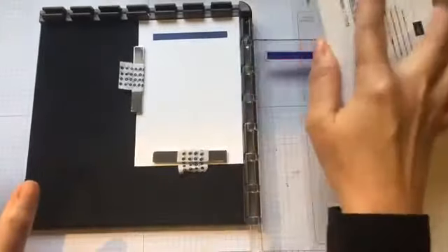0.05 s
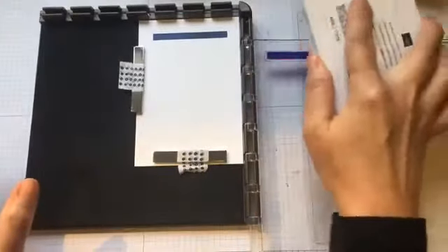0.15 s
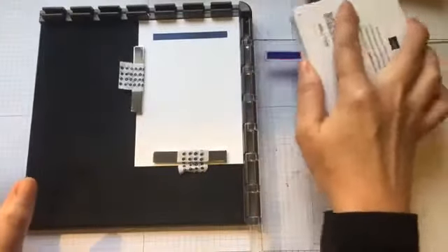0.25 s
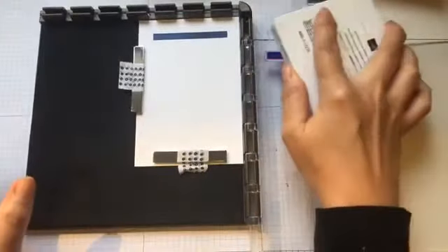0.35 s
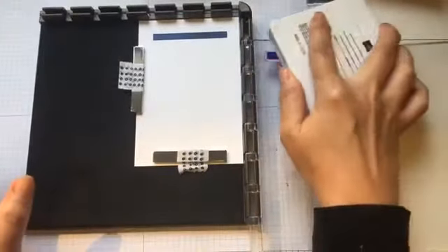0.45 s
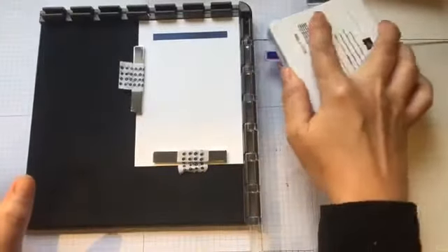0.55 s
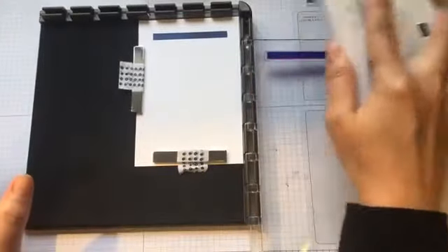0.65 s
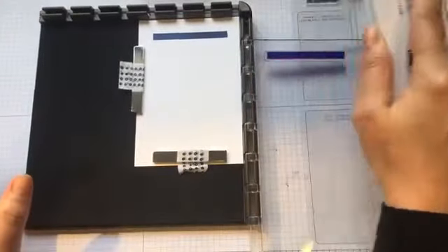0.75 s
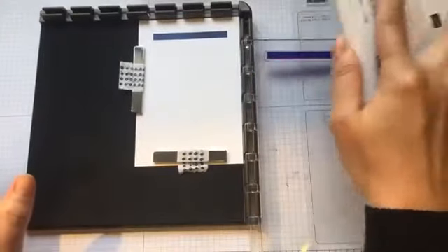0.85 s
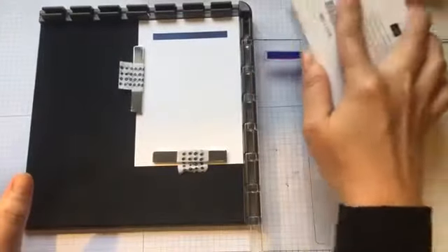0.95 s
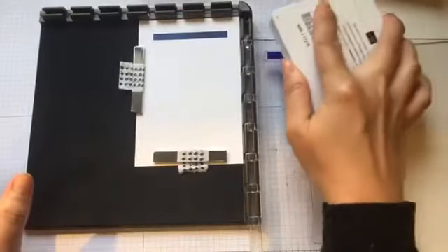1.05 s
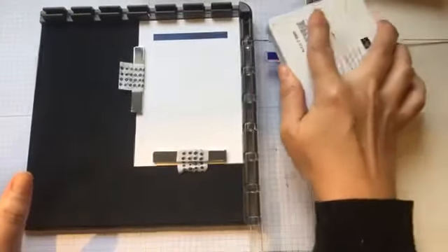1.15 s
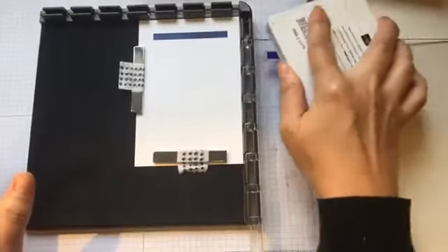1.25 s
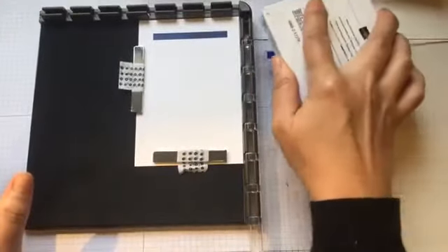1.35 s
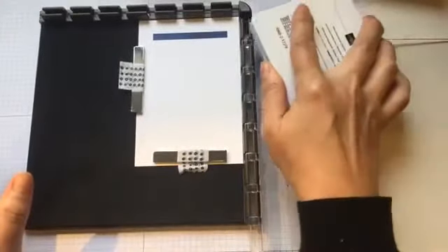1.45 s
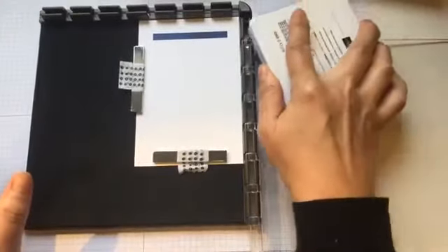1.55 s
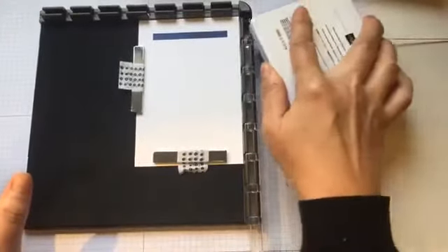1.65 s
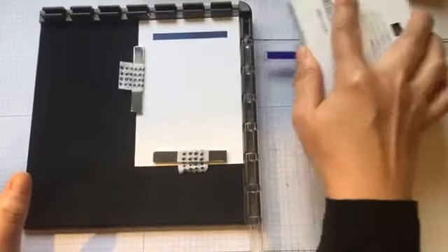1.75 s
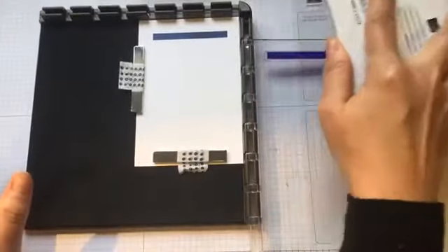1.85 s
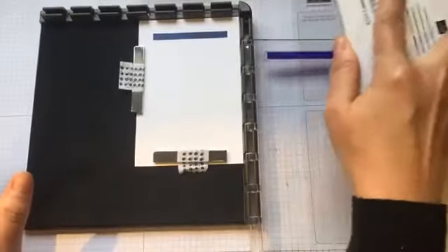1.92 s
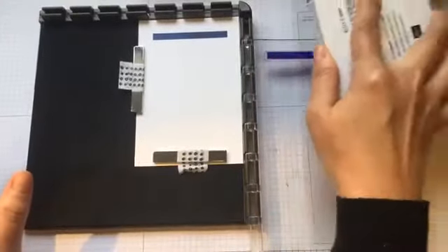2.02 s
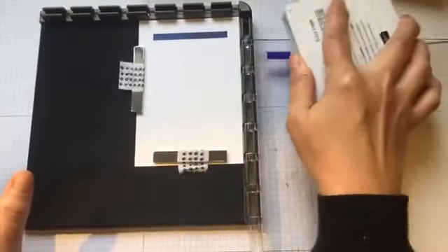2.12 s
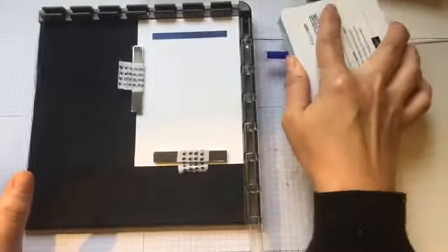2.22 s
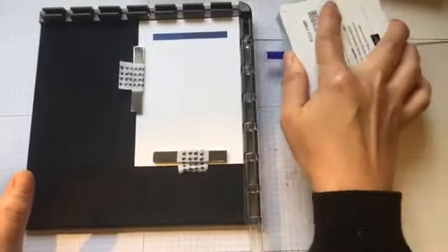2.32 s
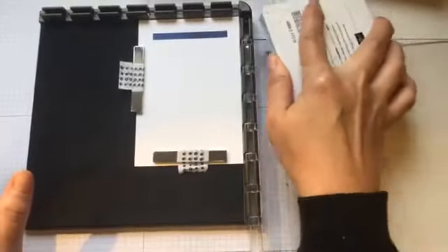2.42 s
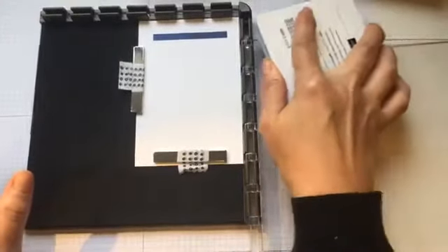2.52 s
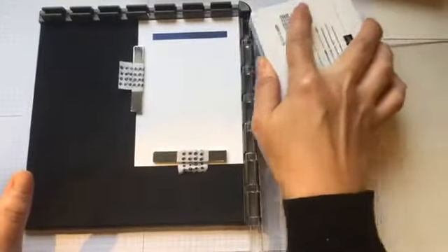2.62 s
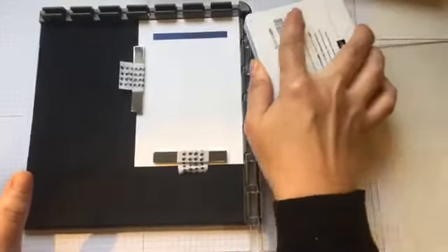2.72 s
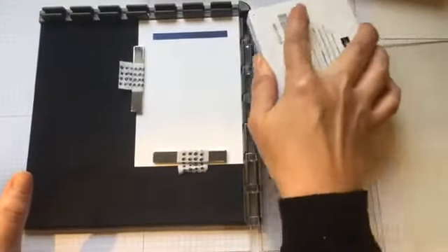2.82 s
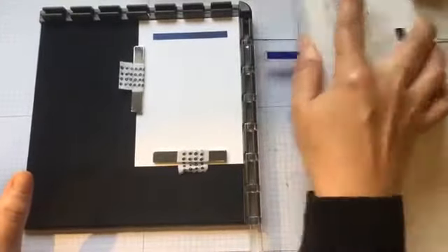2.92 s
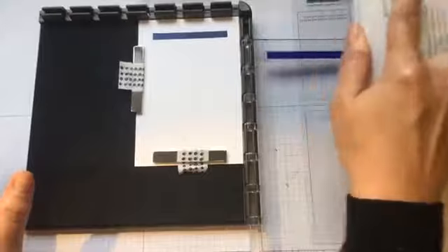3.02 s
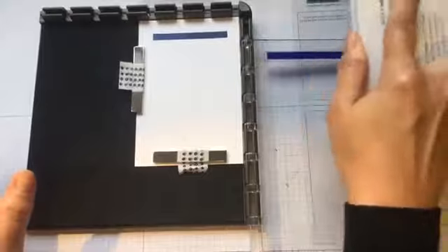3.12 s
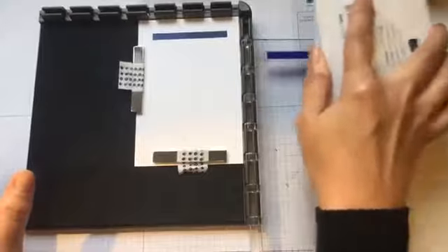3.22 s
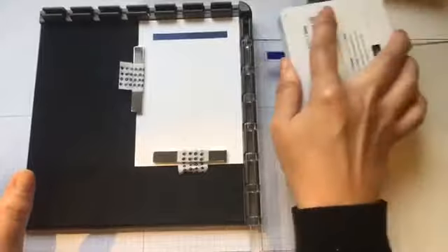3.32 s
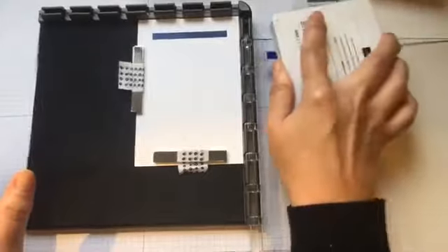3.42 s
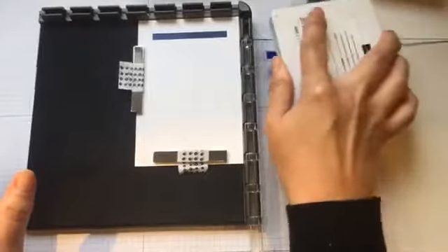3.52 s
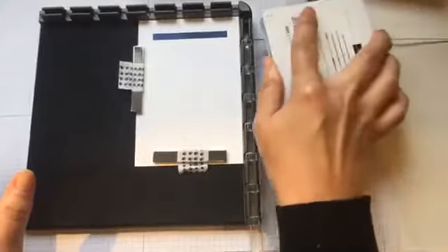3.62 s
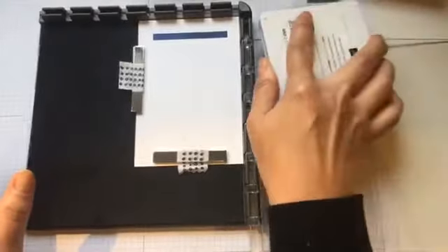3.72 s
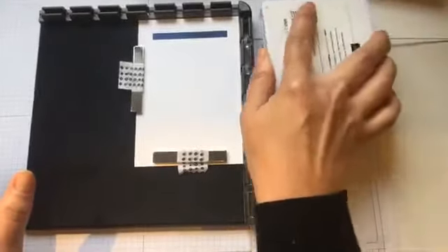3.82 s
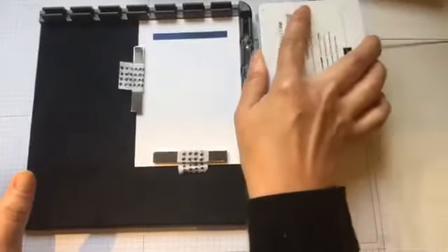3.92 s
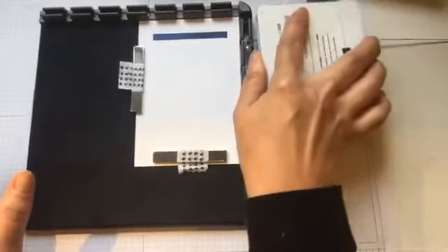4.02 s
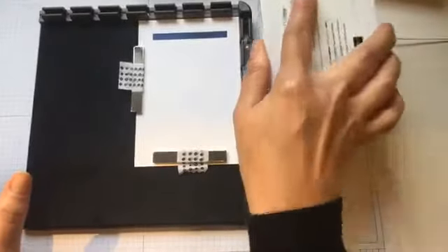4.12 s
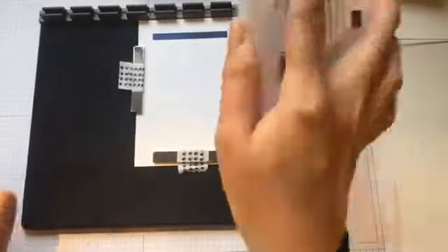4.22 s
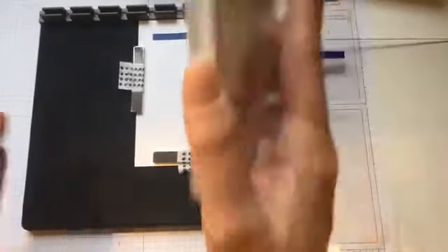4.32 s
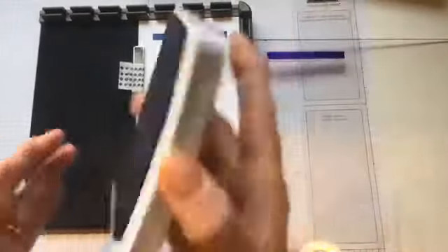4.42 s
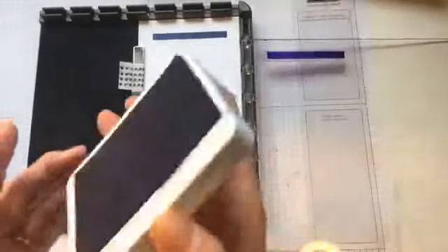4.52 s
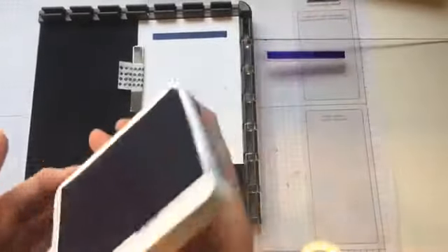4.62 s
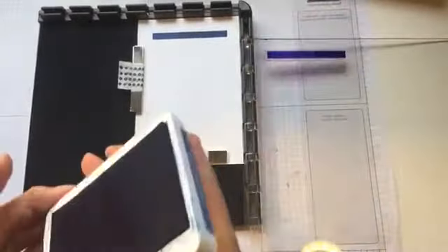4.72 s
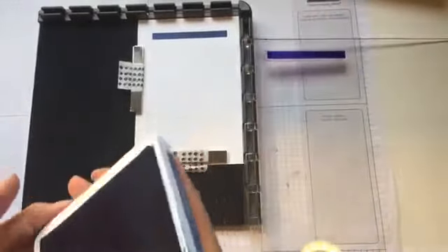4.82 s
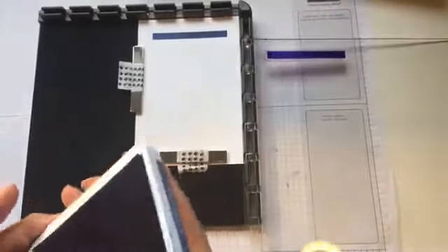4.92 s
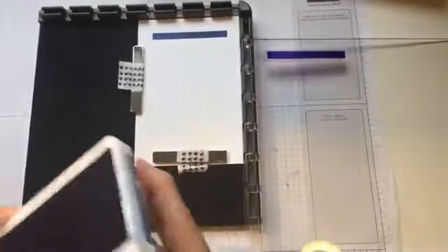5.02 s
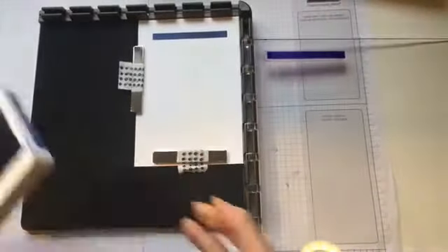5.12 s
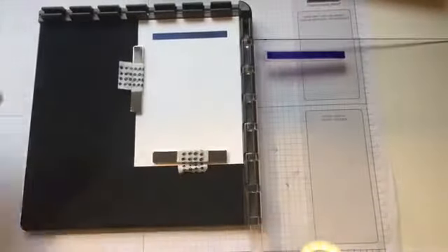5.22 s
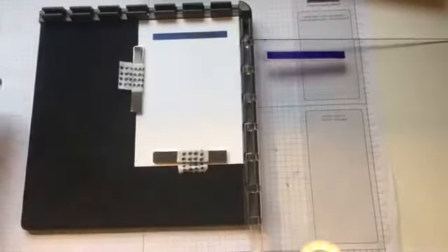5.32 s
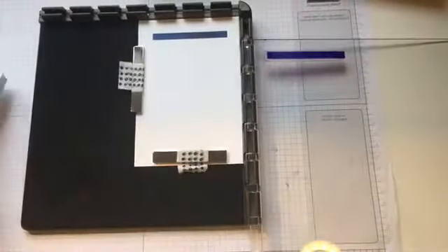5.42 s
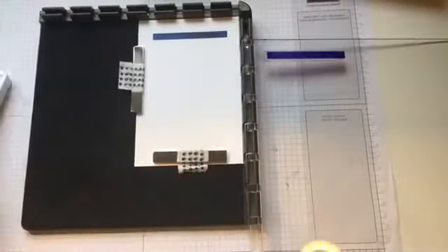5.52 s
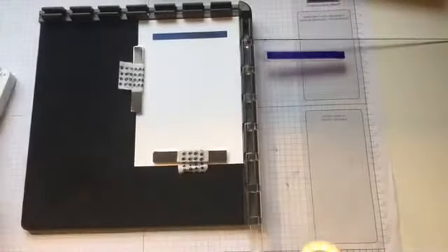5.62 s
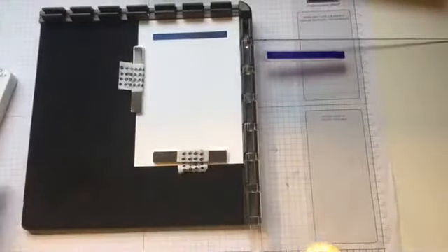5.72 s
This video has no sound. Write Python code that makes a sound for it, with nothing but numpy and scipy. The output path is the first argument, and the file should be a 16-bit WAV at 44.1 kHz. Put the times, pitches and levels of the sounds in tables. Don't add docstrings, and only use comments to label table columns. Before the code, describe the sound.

Close to a phone microphone in a small quiet room, a plastic ink pad taps a stamp plate: one gentle tap, then two firm ones, three more knocks close together, and three evenly spaced. Each knock has a quick bounce and dull desk thud, followed by a faint sticky lift. After a pause with tiny case creaks, the pad clatters onto the desk.

```python
import sys
import numpy as np
from scipy import signal
from scipy.fft import rfft, irfft
from scipy.io import wavfile

SR = 44100
rng = np.random.default_rng(int(sys.argv[2]) if len(sys.argv) > 2 else 0)


def makeup_ratio(level_db):
    decades = np.asarray(level_db, float) / 20
    return 10 ** decades


def store_pcm(level_fs):
    pcm = np.round(np.clip(level_fs, -1, 1) * 32767).astype(np.int16)
    wavfile.write(sys.argv[1], SR, np.atleast_2d(pcm).T)


N = 253927

# frequency [Hz], level [dB per Hz].
AIR_COLOUR = [(15, -33.5), (25, -5), (128, 0), (150, -6), (250, -3), (335, -9), (588, -14), (811, -13),
              (879, -16.5), (1540, -19), (1760, -20), (2430, -20), (13500, -29.5), (15000, -55.5)]
# frequency [Hz], level [dB rms].
HUM_TONES = [(123.8, -90), (247.6, -87), (861.3, -87.5)]
# octave band centre [Hz], t60 [s], level [dB].
ROOM_BANDS = [(86.8, 0.6, -6), (194, 0.3, 5), (313.7, 0.3, -3.5), (720, 0.3, -2), (1400, 0.29, -2.5),
              (2800, 0.29, 0), (5040, 0.29, -1), (10700, 0.28, 0)]
# frequency [Hz], level [dB], t60 [s].
DESK_MODES = [(54.3, -9.5, .2), (79.8, -8.5, 0.18), (92.5, 2.5, 0.11), (115.7, 2.5, 0.1), (137.4, -8, 0.16)]
# frequency [Hz], level [dB], t60 [s].
FLEX_MODES = [(166, -2.5, 0.12), (223, -14.5, 0.14), (269.2, 7.5, 0.086), (317.3, -1.5, 0.095),
              (366, -29.5, 0.024)]
# frequency [Hz], level [dB], t60 [s].
PLATE_MODES = [(468, -44, 0.0097), (532, -7, 0.037), (634, -1, 0.068), (793, -8.5, 0.019),
               (937, -11, 0.081), (1060, -1.5, 0.035), (1272, 2, 0.011), (1472, -10.5, 0.027),
               (1552, 1.5, 0.02), (1658, 5, 0.012), (1970, 0.5, 0.01), (2136, 3, 0.013), (2330, -18, 0.01),
               (2680, -2, 0.012), (2850, 5, 0.008), (3360, -7, 0.0075), (3860, 3.5, 0.0056),
               (4440, 4.5, 0.0036), (5230, 1, 0.012), (5500, -11, 0.012), (6620, -35.5, 0.0052),
               (8530, -5, 0.0043)]
# frequency [Hz], level [dB], t60 [s].
PAD_MODES = [(660, -1.5, 0.068), (770, -2, 0.041), (900, -5, 0.049), (1130, 6, 0.026), (1405, 19.5, 0.0086),
             (1716, 9.5, 0.032), (1900, 8.5, 0.0091), (2200, 3, 0.029), (2560, 9, 0.011), (2700, 4, 0.015),
             (3110, 5, 0.012), (3500, -25, .011), (3730, -19, 0.018), (5300, -29, .009)]
# start [s], peak level [dB], mode favoured [Hz], push on the desk [dB].
SET_DOWNS = [
    (5.5098, -30.5, 3500, -54),
    (5.5115, -31.5, 900, -51.5),
    (5.581, -21.5, 2800, -58),
    (5.582, -16.5, 1130, -47),
    (5.5835, -16.5, 720, -37.5),
    (5.5845, -18, 1680, -35.5),
    (5.589, -27, 770, -28.5),
]
# start [s], peak level [dB], mode favoured [Hz].
FINGER_CREAKS = [
    (3.018, -60.5, 4440),
    (4.473, -41.5, 1400),
    (4.4742, -49.5, 4440),
    (4.478, -49, 1460),
    (5.033, -63, 1400),
    (5.096, -53, 1400),
    (4.4747, -57.5, 660),
]
# start [s], peak level [dB], mode favoured [Hz], push on the desk [dB].
STICKY_LIFTS = [(.612, -75, 600, -49.5), (.666, -62, 2700, -73), (.672, -44, 1400, -41.5),
                (.678, -71, 590, -42.5), (.76, -63, 600, -53.5), (1.349, -38, 900, -41),
                (1.355, -41, 1860, -40.5), (1.672, -38.5, 1450, -42), (1.677, -43, 900, -35.5),
                (1.75, -53, 900, -52), (2.398, -43.5, 900, -46), (2.66, -47, 900, -42),
                (2.878, -64, 1500, -47), (3.545, -42, 1500, -32.5), (3.64, -63, 1500, -51),
                (3.804, -56, 900, -33.5), (3.904, -67, 1700, -71), (4.13, -59, 2900, -58)]
# start [s], peak level [dB], mode favoured [Hz], push on the desk [dB].
EDGE_TICKS = [
    (2.8018, -32, 5570, -60),
]
# start [s], peak level [dB], mode favoured [Hz], push on the desk [dB].
EDGE_KNOCKS = [
    (2.8025, -19, 774, -44),
    (2.8035, -28.5, 1590, -64),
    (2.808, -27, 694, -28.5),
]
# start [s], peak level [dB], mode favoured [Hz], push on the desk [dB].
FAR_EDGE_LANDINGS = [
    (1.255, -26, 510, -25.5),
    (1.602, -23, 1060, -31),
    (2.303, -23, 1036, -23),
    (2.582, -26, 474, -24),
    (2.814, -24.5, 2200, -25.5),
    (2.833, -27.5, 1180, -25.5),
    (3.504, -22, 1060, -24.5),
    (3.776, -26, 1060, -22.5),
    (4.049, -21.5, 1460, -29),
]
# knock [s], peak level [dB], mode favoured by the spot struck [Hz],
# push of the hand on the desk [dB], rebound relative to the knock [dB].
PAD_TAPS = [
    (.502, -26, 2600, -32.5, -6.5),
    (1.2455, -13.5, 2800, -26, -17.5),
    (1.597, -17, 1060, -28, -12),
    (2.298, -16.5, 1060, -26, -13),
    (2.573, -14, 900, -26, -16.5),
    (3.497, -17.5, 1060, -25.5, -16.5),
    (3.768, -16.5, 1060, -28, -11.5),
    (4.043, -15, 2200, -23, -13),
]

# hardness [octaves re 1 kHz], rise of hardness with the mode favoured
# [octaves per octave], desk boom and plate thud relative to the push [dB].
TOUCH = (1.6, 6, -18, -14)
KNOCK = (0.5, -0.02, 1.5, -7)
FAR_EDGE = (-0.7, 0.93, -17.5, -8.5)
REBOUND = (0.64, 0.1, -20, -6.5)
LIFT = (0.1, 1.2, -2.3, -3.5)
CREAK = (0.13, 0.65, -4.5, -4.5)
LANDING = (0.12, 1.44, -10, 0)
EDGE = (0.8, 1.11, -6, -0.7)

AIR_DB = -69.5
ARM_STIR_DB = 0.68
EARLIER_TAP_DB, EARLIER_TAP_S = 6.5, 0.083
ROOM_DB, ROOM_RISE_S = -11.5, 0.0023
PUSH_S = 0.0029
CREAK_PUSH_DB = -50
TOUCH_LEAD_S, TOUCH_DB, TOUCH_HZ = 0.0093, -16.5, 980
REBOUND_S, REBOUND_HZ = 0.0186, 2200
MIC_LOW_HZ, MIC_HIGH_HZ = 59, 15350


def band(x, low_hz, high_hz):
    edges_hz = [low_hz, min(high_hz, 0.45 * SR)]
    return signal.sosfilt(signal.butter(2, edges_hz, "band", fs=SR, output="sos"), x)


def peak_one(x):
    return x / (np.abs(x).max() + 1e-12)


def air():
    hz = np.fft.rfftfreq(N, 1 / SR) + 1
    t = np.arange(N) / SR
    colour_hz, colour_db = np.transpose(AIR_COLOUR)
    colour = makeup_ratio(np.interp(np.log(hz), np.log(colour_hz), colour_db))
    hiss = irfft(rfft(rng.standard_normal(N)) * colour, N)
    hiss = makeup_ratio(AIR_DB) * hiss / np.std(hiss)
    lift_db = ARM_STIR_DB + EARLIER_TAP_DB * np.exp(-(t / EARLIER_TAP_S) ** 2)
    stir = (makeup_ratio(lift_db) - 1) * band(hiss, 29.3, 6000)
    tones = sum(np.sqrt(2) * makeup_ratio(db) * np.sin(2 * np.pi * f * t) for f, db in HUM_TONES)
    return hiss + stir + tones


def wall_noise():
    white = rng.standard_normal((2, SR))
    bands = [band(white[k % 2], hz / np.sqrt(2), hz * np.sqrt(2))
             for k, (hz, t60, db) in enumerate(ROOM_BANDS)]
    return np.array(bands)


def reflections(pattern, stretch):
    t = np.arange(pattern.shape[1]) / SR
    hz, t60, db = np.transpose(ROOM_BANDS)[:, :, None]
    tail = np.sum(pattern * makeup_ratio(db - 60 * t / (t60 * stretch)), axis=0)
    tail = tail * (1 - np.exp(-(t / ROOM_RISE_S) ** 2))
    return tail / np.sqrt(np.sum(tail ** 2))


def ringing(modes, strength_db, t):
    hz, level_db, t60 = np.transpose(modes)[:, :, None]
    decay = makeup_ratio(level_db + strength_db[:, None] - 60 * t / t60)
    return np.sum(decay * np.sin(2 * np.pi * hz * t), axis=0)


def impact_chatter(noise, envelope, soft_hz):
    spectrum = rfft(noise * envelope)
    chatter = irfft(spectrum / np.abs(spectrum)) * envelope ** 0.47
    return band(chatter, 150, soft_hz)


def contacts(rows, body, spread_ms, soft_hz, crack_db, favour_db, wet_db=0, stretch=1):
    out = np.zeros(N + SR)
    t = np.arange(SR // 2) / SR
    walls = wall_noise()
    grit = rng.standard_normal((len(rows), 1024))
    scatter = rng.standard_normal((len(rows), 11))
    phase = t[:1024] / (spread_ms / 1000)
    envelope = phase * np.exp(-phase)
    push = -np.hanning(round(PUSH_S * SR))
    hz = np.array(body)[:, 0]
    for (s, db, hardness, favoured_hz, boom_db, thud_db), noise, luck in zip(rows, grit, scatter):
        chatter = impact_chatter(noise, envelope, soft_hz)
        tilt_db = -2.5 * (np.log2(hz / 1000) - hardness) ** 2
        spot_db = favour_db * np.exp(-(np.log2(hz / favoured_hz) / 0.21) ** 2)
        ring = peak_one(signal.fftconvolve(chatter, ringing(body, tilt_db + spot_db, t[:3000])))
        crack = peak_one(band(noise * np.exp(-t[:1024] / 0.0016), 5000, 15000))
        boom = peak_one(signal.fftconvolve(push, ringing(DESK_MODES, 10.0 * luck[:5], t)))
        thud = peak_one(signal.fftconvolve(push, ringing(FLEX_MODES, 2.0 * luck[5:10], t[:8000])))
        direct = makeup_ratio(boom_db) * boom[:len(t)]
        for layer, gain_db in ((ring, 0), (crack, crack_db + 8.4 * hardness), (thud, thud_db)):
            direct[:len(layer)] += makeup_ratio(gain_db) * layer
        shift = int(abs(luck[10]) * 7000) % len(t)
        tail = reflections(walls[:, shift:shift + SR // 3], stretch)
        heard = direct + makeup_ratio(ROOM_DB + wet_db) * signal.fftconvolve(direct, tail)[:len(t)]
        at = round(s * SR)
        out[at:at + len(t)] += makeup_ratio(db) * heard
    return out[:N]


def as_contacts(rows, kind):
    hardness, rise, boom_db, thud_db = kind
    return [(s, db, hardness + rise * np.log2(hz / 1000), hz, push_db + boom_db - db, push_db + thud_db - db)
            for s, db, hz, push_db in rows]


def finger_creaks():
    rows = [(s, db, hz, db + CREAK_PUSH_DB) for s, db, hz in FINGER_CREAKS]
    return contacts(as_contacts(rows, CREAK), PLATE_MODES, spread_ms=0.61, soft_hz=9100, crack_db=-13,
                    favour_db=32.5, wet_db=-1.5)


def pad_set_down():
    return contacts(as_contacts(SET_DOWNS, LANDING), PAD_MODES, spread_ms=0.86, soft_hz=8800, crack_db=-38.0,
                    favour_db=15.5, wet_db=2.5, stretch=1.14)


def sticky_lifts():
    return contacts(as_contacts(STICKY_LIFTS, LIFT), PLATE_MODES, spread_ms=2.1, soft_hz=3160, crack_db=-35,
                    favour_db=15.5)


def edge_blow():
    knock = contacts(as_contacts(EDGE_KNOCKS, EDGE), PLATE_MODES, spread_ms=1.04, soft_hz=8800, crack_db=-39,
                     favour_db=29, wet_db=1.0)
    tick = contacts(as_contacts(EDGE_TICKS, EDGE), PLATE_MODES, spread_ms=1.6, soft_hz=9450, crack_db=-34,
                    favour_db=21, wet_db=-5)
    return knock + tick


def pad_taps():
    s, db, hz, push_db, rebound_db = np.transpose(PAD_TAPS)
    same = np.ones(len(s))
    touches = np.transpose([s - TOUCH_LEAD_S, db + TOUCH_DB, TOUCH_HZ * same, push_db])
    knocks = np.transpose([s, db, hz, push_db])
    rebounds = np.transpose([s + REBOUND_S, db + rebound_db, REBOUND_HZ * same, push_db])
    bounces = as_contacts(FAR_EDGE_LANDINGS, FAR_EDGE) + as_contacts(rebounds, REBOUND)
    touch = contacts(as_contacts(touches, TOUCH), PLATE_MODES, spread_ms=2.57, soft_hz=3020, crack_db=-41.0,
                     favour_db=14.5)
    knock = contacts(as_contacts(knocks, KNOCK), PLATE_MODES, spread_ms=1.78, soft_hz=11900, crack_db=-24.5,
                     favour_db=5.5)
    bounce = contacts(bounces, PLATE_MODES, spread_ms=2.07, soft_hz=7900, crack_db=-37.0, favour_db=7.5)
    return touch + knock + bounce


def scene():
    handling = finger_creaks() + pad_set_down() + sticky_lifts()
    close = handling + edge_blow() + pad_taps()
    close = signal.sosfilt(signal.butter(3, MIC_LOW_HZ, "high", fs=SR, output="sos"), close)
    return (close + air())[None, :]


def low_pass(x):
    return signal.sosfilt(signal.butter(12, 15150, fs=SR, output="sos"), x)


def record(dry):
    top_cut = signal.cheby2(10, 45, MIC_HIGH_HZ, fs=SR, output="sos")
    mix = signal.sosfilt(top_cut, dry)
    return low_pass(mix)


dry = scene()
out = record(dry)
store_pcm(out)
```